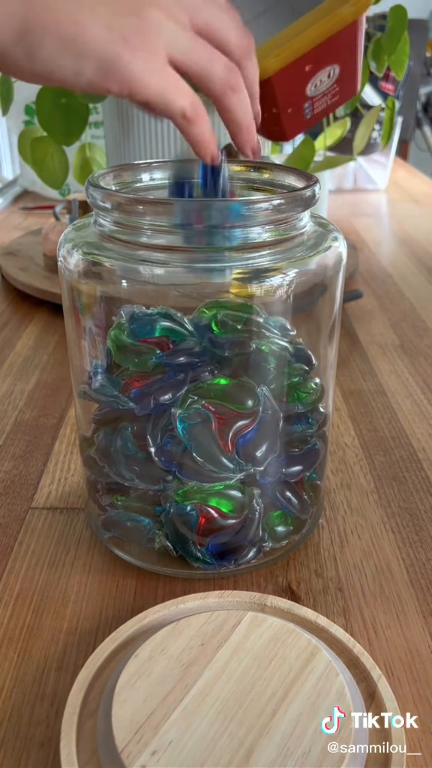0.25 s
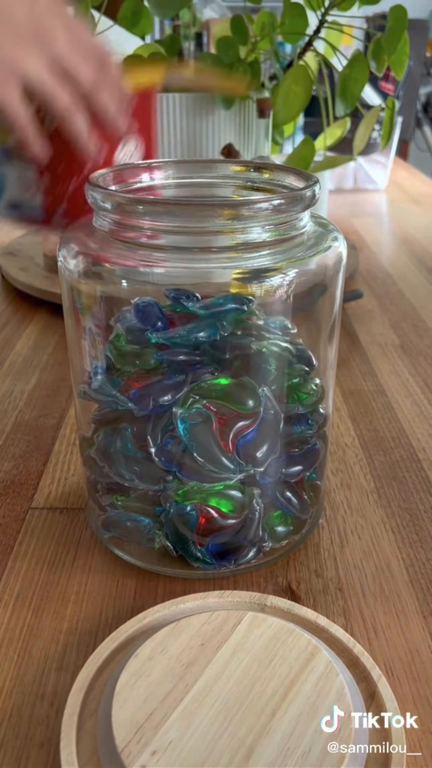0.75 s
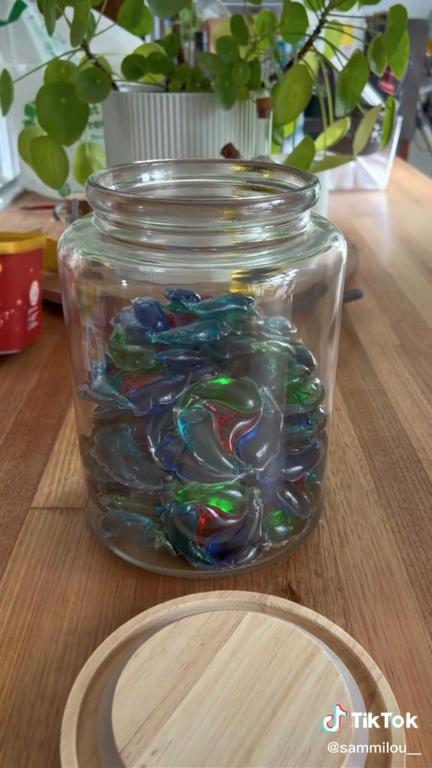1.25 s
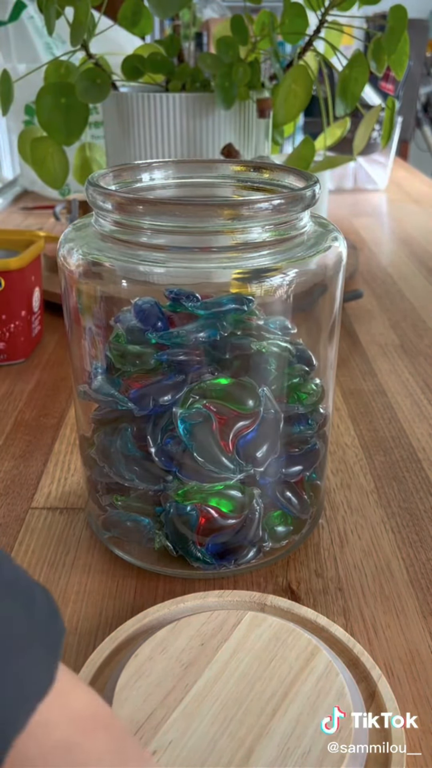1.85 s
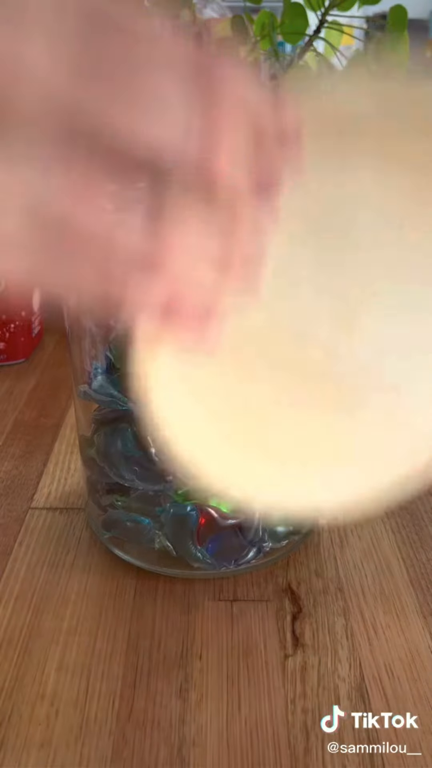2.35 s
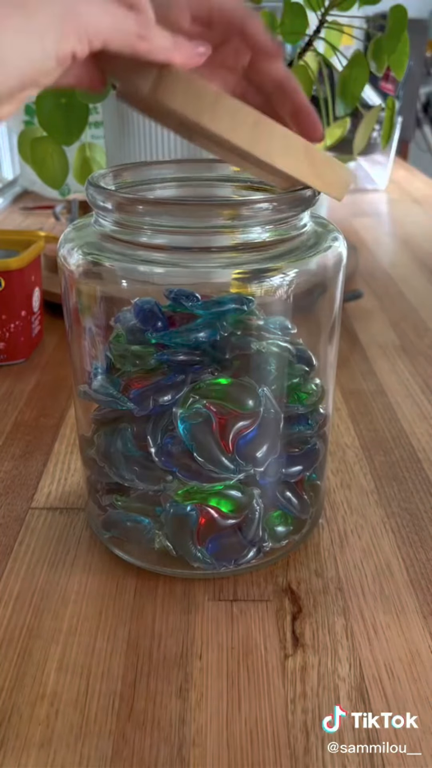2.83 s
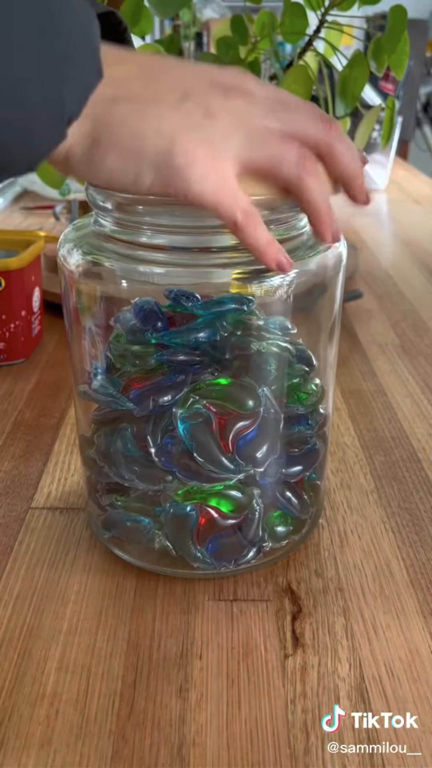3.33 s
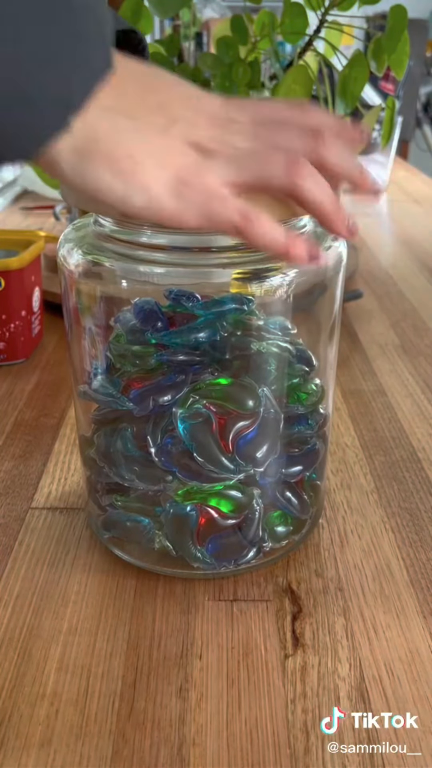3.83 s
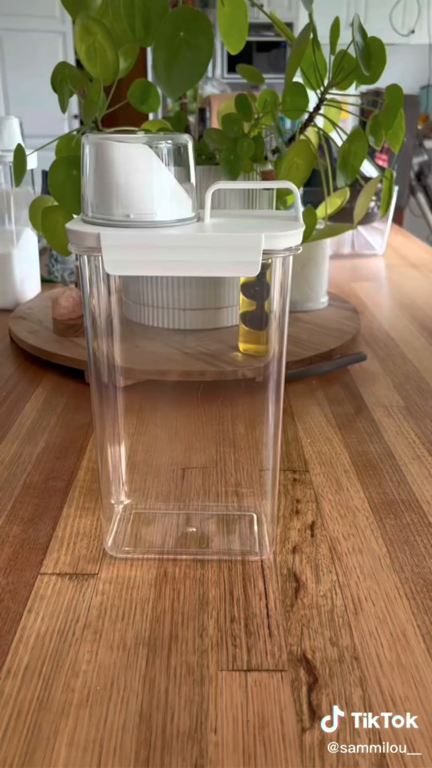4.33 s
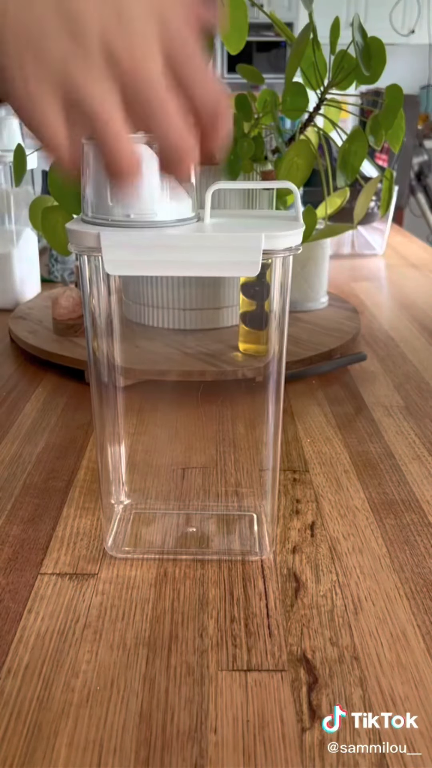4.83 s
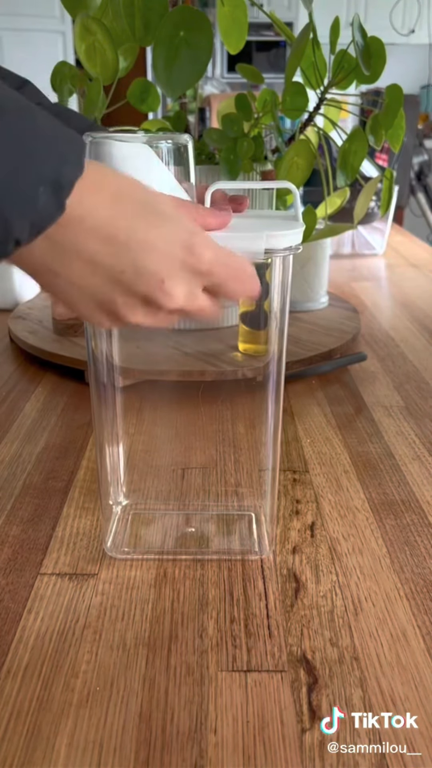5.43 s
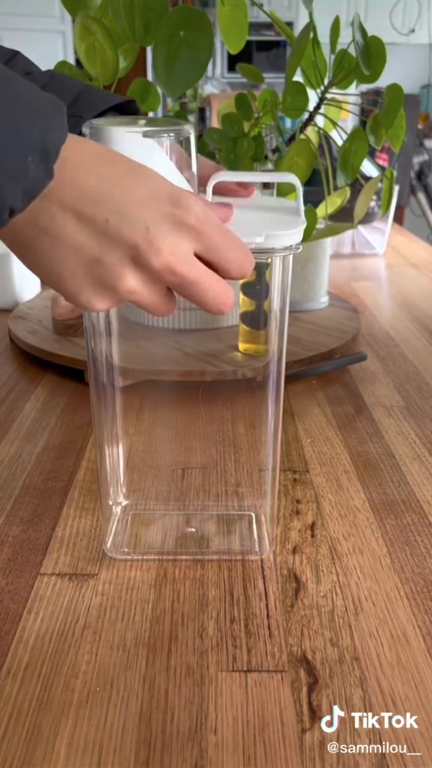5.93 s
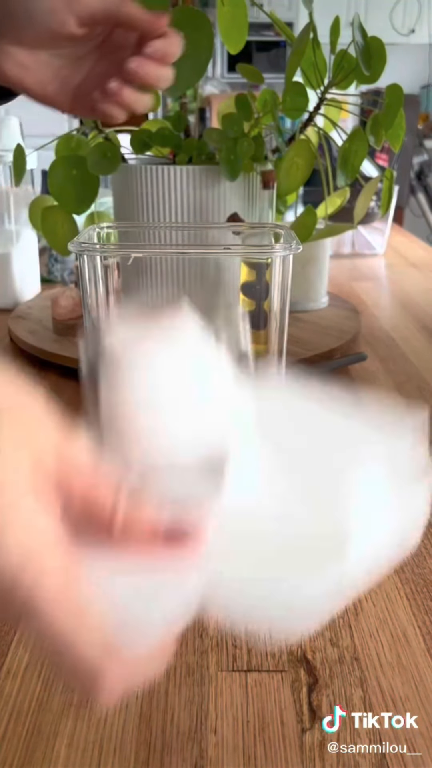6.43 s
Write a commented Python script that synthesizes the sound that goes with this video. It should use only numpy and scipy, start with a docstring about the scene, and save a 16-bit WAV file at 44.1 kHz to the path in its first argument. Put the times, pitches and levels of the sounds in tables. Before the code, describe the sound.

Close kitchen counter handling: faint pod taps, tub knock, wooden lid knocking onto glass, two sharp plastic latch snaps, and small creaks.

```python
"""Pods, a glass jar and a latched box

On a kitchen counter pods drop into a glass jar, an empty plastic tub is set down, a bamboo lid is slid off
the wood and pressed onto the jar; then two latches of a plastic box snap open and its lid is worked off.
Each blow rings modes of its object and of the wooden counter and adds a crack of noise; rubs are showers of
tiny blows, creaks are gliding sines, and a room of sparse echoes surrounds rumble, rustle, hush and faint hum.
"""
import sys
import numpy as np
from scipy import signal
from scipy.fft import rfft, irfft, next_fast_len
from scipy.io import wavfile
from scipy.ndimage import uniform_filter1d

SR = 44100
rng = np.random.default_rng(int(sys.argv[2]) if len(sys.argv) > 2 else 0)


def generate_wav(signal):
    """Clip the signal to [-1, 1] and save it as 16-bit WAV at the path in sys.argv[1]."""
    frames = np.transpose(np.atleast_2d(signal))
    scaled = np.clip(frames, -1, 1) * 32767
    pcm = np.round(scaled).astype(np.int16)
    wavfile.write(sys.argv[1], SR, pcm)


N = 294587

# In every table of blows, each row: start in seconds, object ring in dB, counter ring in dB,
# pitch that the counter favours there in Hz, crack in dB.
# In every table of modes, each row: frequency in Hz, relative level in dB, t60 in seconds before damping.
# In every table of colour, each row: frequency in Hz, spectral weight in dB per Hz.
# In every touch: contact in ms when ring and crack are equal in dB, dB of ring over crack that double it,
# crack t60 in ms, damping factor of the hand, tick against crack in dB.

# Pods landing in the jar, the modes of the glass, the colour of cracks on wood, and the touch.
PODS = [(0.303, -45, -38, 153, -69), (0.507, -58, -53, 218, -46.5), (0.594, -59, -60, 172, -51),
        (0.636, -50, -43, 202, -45.5), (0.67, -39, -49, 200, -46.5), (0.701, -33.5, -66, 121, -47),
        (0.835, -37, -55, 258, -40.5), (0.85, -41, -51, 237, -49), (0.985, -38, -47, 135, -65)]
JAR_MODES = [(270.6, -7, 0.09), (304.6, -5.5, 0.11), (398, -0.5, 0.042), (463, 1, 0.045), (533, 3.5, 0.025),
             (589, -6.5, 0.059), (644, -14.5, 0.096), (754, -25.5, 0.2), (915, -23, 0.012),
             (1070, -15, 0.064), (1395, -17, 0.08), (1520, -15.5, 0.011), (1770, -13.5, .026),
             (2060, 1, 0.025), (2964, -8, .08), (3548, -10, 0.063), (4540, -13.5, 0.076),
             (5700, -22.5, .06), (6080, -18.5, 0.11), (6290, -14.5, 0.05)]
WOOD_CRACK = [(350, -73), (600, 6), (916, -7), (1340, -0.5), (1580, -7.5), (2170, -7), (3500, -7.5),
              (4850, -14.5), (6210, -12.5), (15700, -26)]
PODS_TOUCH = (1.9, 113, 170, 1.1, 0)


def pods_into_jar():
    """Impact excitation: each soft pod rings the glass modes."""
    return blows(PODS, JAR_MODES, WOOD_CRACK, PODS_TOUCH)


# Blows of the tub on the counter, the modes of the tub, the colour of plastic cracks, and the touch.
TUB = [(1.066, -1.5, -25.5, 200, -7.5), (1.07, -16, -6.5, 137, -34.5), (1.097, -29, -46, 121, -36),
       (1.119, -40, -20, 118, -44), (1.168, -23, -39, 153, -27.5), (1.228, -26, -47, 200, -33.5),
       (1.24, -24, -50, 172, -27.5), (1.323, -28.5, -44, 151, -36), (1.412, -33, -34, 91, -70),
       (1.467, -52, -40, 115, -42.5)]
TUB_MODES = [(308, -2.5, 0.047), (430, 16.5, 0.012), (523, 3.5, 0.077), (570, -1, 0.053), (660, 0.5, 0.074),
             (827, 3, 0.023), (1148, 2, 0.068), (1750, 6.5, 0.0093), (2560, -10, 0.041)]
PLASTIC_CRACK = [(350, 9), (600, -7), (2000, -4), (2290, -6.5), (2930, -4), (3400, -3), (4060, -2.5),
                 (4850, -5), (6290, -3.5), (15700, -14.5)]
TUB_TOUCH = (0.63, 18, 30.5, 1.14, -0.5)


def tub_set_down():
    """Impact excitation: the plastic tub rings in heavily damped modes."""
    return blows(TUB, TUB_MODES, PLASTIC_CRACK, TUB_TOUCH)


# Blows of the bamboo lid on the wood, the modes of the lid, and the touch.
LID = [(1.538, -24.5, -29, 263, -29.5), (1.568, -19, -21, 194, -35), (1.597, -56, -23.5, 201, -48),
       (1.626, -48, -30, 202, -61), (1.736, -32.5, -47, 225, -43.5), (1.913, -29.5, -27, 227, -43),
       (1.938, -18.5, -25, 205, -42), (1.976, -28, -48, 258, -25), (1.987, -23, -48, 258, -34),
       (2.058, -35, -58, 164, -32), (2.784, -42, -40, 183, -47.5), (2.807, -35.5, -41, 62, -47)]
LID_MODES = [(302, 3.5, 0.15), (410, 15, 0.028), (574.5, -8, 0.48), (793, -2, 0.045), (1335, -5.5, 0.045),
             (1840, -9, 0.021), (2170, -1, 0.029), (2680, -6.5, .035), (2980, -4, 0.021),
             (3390, -16.5, 0.022), (3730, -9, 0.034), (4500, -18, .03), (6170, -13.5, 0.05)]
LID_TOUCH = (0.4, 50, 49, 1.6, 3)


def lid_off_the_wood():
    """Impact excitation: the bamboo lid rings as it knocks the counter."""
    return blows(LID, LID_MODES, WOOD_CRACK, LID_TOUCH)


# Blows of the lid on the jar, and the touch.
JAR = [(2.985, -41, -18.5, 211, -44.5), (3.026, -21, -40, 250, -29.5), (3.031, -43, -3, 256, -42),
       (3.0335, 5, -32, 252, -20), (3.04, -16, -20, 258, -50.5), (3.049, -19, -23.5, 236, -42),
       (3.257, -29.5, -28, 121, -47), (3.295, -20, -26, 135, -85), (3.351, -28, -23.5, 260, -59),
       (3.359, -9.5, -12.5, 203, -47), (3.473, -52, -60, 176, -22.5), (3.483, -26, -23, 124, -33),
       (3.502, -13.5, -32.5, 62.6, -31), (3.512, -16.5, -41, 258, -38), (3.527, -16, -45.5, 123, -44),
       (3.544, -52, -29, 121, -53), (3.61, -37, -35, 127, -60), (4.067, -66, -37, 183, -60)]
JAR_TOUCH = (0.55, 46, 18, 1.01, 1.4)


def lid_onto_jar():
    """Impact excitation: the lid strikes the jar and rings the glass modes."""
    return blows(JAR, JAR_MODES, WOOD_CRACK, JAR_TOUCH)


# Snaps of the latches and knocks of the box lid, the modes of the box, and the touch.
BOX = [(5.016, -10.5, -50, 217, -14.5), (5.023, -5.5, -0.5, 227, -12.5), (5.04, -7, -9, 231, -11.5),
       (5.05, -15.5, -11.5, 227, -25), (5.072, -24, -37, 223, -36), (5.092, -27, -32, 223, -49),
       (5.179, -38.5, -18, 219, -52), (5.246, -41, -20.5, 216, -56), (5.303, -28.5, -27.5, 217, -45.5),
       (5.435, -38, -52, 244, -29), (5.4445, -1, -27, 250, -4), (5.448, -1.5, -43, 250, -14.5),
       (5.452, -2.5, -6, 250, -19), (5.469, -1.5, -1, 240, -16.5), (5.475, -11.5, -28, 135, -19),
       (5.519, -44, -11.5, 123, -31), (5.649, -19, -31, 204, -41.5), (5.711, -31, -30.5, 218, -34.5),
       (5.791, -33.5, -27.5, 200, -35), (5.871, -49, -33, 209, -54), (5.899, -44, -33, 242, -45),
       (5.912, -28.5, -28.5, 150, -33), (5.997, -30.5, -22.5, 150, -33.5), (6.014, -30, -58, 250, -35),
       (6.141, -50, -43, 204, -41.5), (6.2, -65, -53, 255, -27.5), (6.256, -65, -29, 142, -27.5),
       (6.268, -59, -48, 199, -47)]
BOX_MODES = [(219.5, -3, 0.075), (293, -12, 0.13), (372, -16, 0.096), (442, -5, 0.08), (531, -1.5, 0.029),
             (603, 4.5, 0.1), (677, -6.5, 0.17), (804, 0, 0.074), (997, 0, 0.032), (1118, 0.5, 0.019),
             (1403, 2, 0.018), (1590, -1.5, 0.036), (1864, 2, 0.019), (2120, 0.5, 0.024), (2920, 5, 0.024),
             (3560, -6.5, 0.027), (4020, 14.5, 0.0071), (5450, -0.5, 0.03), (6160, -4.5, 0.023)]
BOX_TOUCH = (0.15, 5.28, 43.4, 0.77, 2.3)


def box_opened():
    """Impact excitation: hard snaps have a short contact and so a bright spectrum."""
    return blows(BOX, BOX_MODES, PLASTIC_CRACK, BOX_TOUCH)


# The modes of the wooden counter.
COUNTER_MODES = [(49.6, -8, 0.23), (85, -34, .2), (121, 2, 0.18), (139, 7.5, 0.051), (172, -5, 0.079),
                 (217, 16, 0.044), (242, -6, 0.11)]
TICK_FROM_HZ = 1250  # the hard edge of a blow rings the modes above this
BLOW_DETUNE = 0.012  # each blow randomly detunes each mode by up to this share


def blows(rows, modes, crack_colour, touch):
    """Modal superposition: a blow rings object and counter, ticks upper modes and cracks; returns rings, cracks."""
    rings, cracks = np.zeros((2, N))
    equal_ms, doubling_db, crack_t60_ms, damping, tick_db = touch
    upper_db = np.where(np.transpose(modes)[0] > TICK_FROM_HZ, 0, -99)
    counter_hz = np.transpose(COUNTER_MODES)[0]
    for start, object_db, counter_db, favoured_hz, crack_db in rows:
        chance_db = 2 * np.clip(rng.standard_normal(32), -1.5, 1.5)
        tuning = 1 + BLOW_DETUNE * rng.uniform(-1, 1, 32)
        thing = decays(modes, damping, tuning[:len(modes)])
        counter = decays(COUNTER_MODES, 0.86, tuning[-len(COUNTER_MODES):])
        thing_db = chance_db[:len(thing)]
        place_db = -9.0 * np.log2(counter_hz / favoured_hz) ** 2
        counter_weight_db = chance_db[-len(counter):] + place_db
        # dull blows touch longer
        contact_ms = np.clip(equal_ms * 2 ** ((object_db - crack_db) / doubling_db), 0.1, 2.2)
        counter_ms = 3.97 * max(contact_ms, 0.5)
        add(rings, start, gain_of(object_db) * ring(thing, thing_db, contact_ms))
        add(rings, start, gain_of(counter_db) * ring(counter, counter_weight_db, counter_ms))
        add(rings, start, gain_of(crack_db + tick_db) * ring(thing, thing_db + upper_db, 0))
        add(cracks, start, burst(crack_colour, crack_db, crack_t60_ms))
    return np.array([rings, cracks])


def decays(modes, damping=1, tuning=1):
    """Free vibration: one exponentially dying sine a mode, neighbours swinging in opposite senses."""
    t = np.arange(SR // 4) / SR
    hz, db, t60 = np.transpose(modes)[:, :, None]
    sense = (-1.0) ** np.arange(len(modes))[:, None]
    turns = hz * np.reshape(tuning, (-1, 1)) * t
    fade_out = np.cos(2 * np.pi * t) ** 2  # silent by the end of the quarter second
    return sense * gain_of(db - 60 * damping * t / t60) * np.sin(2 * np.pi * turns) * fade_out


def ring(rings, weight_db, contact_ms):
    """Contact-time filtering: convolution with a long force pulse leaves high modes quiet."""
    force = signal.windows.hann(3 + int(contact_ms * SR / 1000))
    return peaked(np.convolve(gain_of(weight_db) @ rings, force))


def burst(colour, db, t60_ms):
    """Decaying noise transient: long cracks swell more slowly; a filter lowers the top of quiet ones."""
    noise = evened(coloured(rng.standard_normal(8000), colour))
    noise = coloured(noise, [(12600, 0.081), (13300, 0.82 * min(db + 8.5, 0))])
    spent = 1000 * np.arange(8000) / SR / t60_ms  # time as a share of t60
    swell = np.minimum(spent / 0.054, 1)
    return gain_of(db - 60 * spent) * noise * swell


# Loose plastic, then the lid on the rim, rattling on after hard blows.
# Each row: start in seconds, level in dB, t60 in ms (the burst stops after 0.18 s).
RATTLES = [(1.07, -34, 930), (5.051, -21.5, 145), (5.473, -22, 69)]
LID_RATTLES = [(3.037, -32.5, 61), (3.502, -29.5, 110)]


def rattles():
    """Chatter of loose contacts as decaying noise, coloured by plastic or by wood."""
    out = np.zeros(N)
    for rows, colour in (RATTLES, PLASTIC_CRACK), (LID_RATTLES, WOOD_CRACK):
        for start, db, t60_ms in rows:
            add(out, start, burst(colour, db, t60_ms))
    return out


# Slips of the box lid in its seat.
# Each row: start in seconds, peak level in dB, starting pitch in Hz, t60 in ms.
CREAKS = [(5.914, -20, 253, 63), (5.944, -22.5, 284.7, 340), (5.966, -24, 257, 38),
          (5.995, -24.5, 287.3, 180), (6.07, -38, 283, 130), (6.123, -20, 292.3, 48), (6.143, -21, 304, 50),
          (6.161, -26, 300, 87), (6.185, -40, 277, 57), (6.232, -24.5, 217, 75), (6.254, -23, 286, 51),
          (6.271, -30, 278, 53)]
CREAK_RISE_MS, CREAK_GLIDE = 3.2, 1.1  # glide in octaves a second


def creaks():
    """Stick-slip: each slip swings the box wall at a pitch that slides up as the grip changes."""
    out, t = np.zeros(N), np.arange(5000) / SR
    for start, db, hz, t60_ms in CREAKS:
        swing = np.minimum(1000 * t / CREAK_RISE_MS, 1) * gain_of(-60000 * t / t60_ms)
        turns = np.cumsum(hz * 2 ** (CREAK_GLIDE * t)) / SR
        add(out, start, gain_of(db) * peaked(swing * np.sin(2 * np.pi * turns)))
    return out


# The lid sliding on the wood. Each row: time in seconds, level in dB.
LID_SCRAPE = [(1.92, -51), (1.94, -42), (1.985, -33.5), (2.03, -54), (2.05, -61), (2.06, -53), (2.083, -48),
              (2.1, -72)]


def lid_scrape():
    """Friction excitation of the bamboo lid."""
    return scrape(LID_SCRAPE, LID_MODES, WOOD_CRACK, damping=1.0, rasp_share=0.67)


# Fingers on the box lid. Each row: time in seconds, level in dB.
BOX_RUB = [(5.85, -70), (5.875, -50), (5.91, -47), (5.95, -63), (6.0, -47), (6.06, -52), (6.11, -73),
           (6.145, -53), (6.19, -47.5), (6.27, -58), (6.31, -70)]


def box_rub():
    """Friction excitation of the plastic box."""
    return scrape(BOX_RUB, BOX_MODES, PLASTIC_CRACK, damping=0.7, rasp_share=1.0)


# Fingers in the tub. Each row: time in seconds, level in dB.
TUB_RUB = [(0.58, -76), (0.63, -56), (0.7, -47.5), (0.76, -72)]


def tub_rub():
    """Friction excitation of the tub, strongly damped by the hand."""
    return scrape(TUB_RUB, TUB_MODES, WOOD_CRACK, damping=1.9, rasp_share=0.5)


RUB_DETUNE = 0.077  # each mode copy is randomly detuned by up to this share


def scrape(stroke, modes, colour, damping, rasp_share):
    """Friction as random impulses: uneven catches ring one or another upper mode over a rasp of noise."""
    out, size = np.zeros(N), SR // 2
    strength = gain_of(4.0 * np.minimum(rng.exponential(1, size), 2.5))
    caught = rng.random(size) < 1800 / SR  # about 1800 catches a second
    catches = rng.standard_normal(size) * strength * caught
    upper = 2 * [mode for mode in modes if mode[0] > 1100]  # two copies of each mode
    tuning = 1 + RUB_DETUNE * rng.uniform(-1, 1, len(upper))
    rings = decays(upper, damping, tuning)[:, :2000]
    which = rng.integers(0, len(rings), size)
    rung = np.zeros(size)
    for k, mode_ring in enumerate(rings):
        rung += signal.oaconvolve(catches * (which == k), mode_ring)[:size]
    rasp = coloured(rng.standard_normal(size), colour)
    add(out, stroke[0][0], evened(evened(rung) + rasp_share * evened(rasp)))
    return gain_of(*curve(stroke)) * out


# The seal in the rim of the jar. Each row: time in seconds, hiss in dB, squeak in dB.
SEAL_RUB = [(3.355, -99, -80), (3.365, -50, -64), (3.39, -41, -59), (3.46, -43, -53), (3.52, -59, -50),
            (3.62, -75, -48), (3.75, -58, -51), (3.9, -69, -58)]
# Colours of the hiss and of the squeak.
SEAL = [(400, -21), (1200, -9), (2500, 0.5), (6000, -5.5), (9500, -2), (12600, -3), (13300, -15),
        (15500, -12)]
SQUEAK = [(1900, -42), (2300, -1), (2440, 1.5), (2600, -11), (2900, -3), (3200, -20), (3500, -5),
          (3800, -12), (6100, -21), (6380, -3), (6700, -47)]


def seal_rub():
    """Friction noise: a broad hiss and a squeak gathered in narrow bands."""
    hiss_db, squeak_db = curve(SEAL_RUB)
    hiss = stirring(SEAL, hiss_db, patchy_db=1.7, flicker_db=1.9)
    return hiss + stirring(SQUEAK, squeak_db, patchy_db=0.64, flicker_db=0.69)


# Arms leaning on the counter. Each row: middle in seconds, level in dB, half length in seconds.
LEANS = [(0.124, -55, 0.061), (1.304, -28.5, 0.081), (1.922, -46, 0.11), (2.812, -53, 0.033),
         (3.133, -38, 0.035), (3.406, -27, 0.12), (3.57, -43, 0.054), (5.56, -38, 0.081),
         (6.117, -28, 0.06), (6.352, -39.5, 0.3)]
# The floor under them. Each row: time in seconds, level in dB.
LEAN_FLOOR = [(0, -69), (3.6, -46.5), (4.2, -52), (4.32, -65), (5.9, -57), (6.68, -48)]
# Colour of the thuds.
THUD = [(12, -41), (20, -17), (31, -15.5), (48, -21), (97, -31), (110, 2), (140, -42), (240, -120)]


def leaning_thuds():
    """Low-frequency noise under Gaussian envelopes: each lean swells and fades like a bell curve."""
    t = np.arange(N) / SR
    level = gain_of(*curve(LEAN_FLOOR))
    for middle, db, half in LEANS:
        level += gain_of(db) * np.exp(-((t - middle) / half) ** 2)
    return stirring(THUD, 20 * np.log10(level), patchy_db=4.0, flicker_db=3)


# Movement close by. Each row: time in seconds, rumble in dB before the blows add to it,
# rustle of sleeves and hands in dB.
STIR = [(0.0, -47.5, -67.5), (0.29, -49.5, -85), (0.3, -46, -55), (0.42, -49, -60), (0.66, -46.5, -54.5),
        (1.2, -45.5, -50.5), (1.36, -34, -49), (1.46, -44.5, -51), (1.95, -45.5, -56.5),
        (2.15, -45.5, -49.5), (2.61, -48, -52), (2.82, -49.5, -65), (3.0, -45.5, -55.5), (3.4, -39, -61),
        (3.5, -57, -46.5), (3.79, -48.5, -51.5), (4.3, -47, -49.5), (4.32, -52, -59), (4.81, -55, -47.5),
        (4.98, -48, -53), (5.36, -39, -54.5), (5.77, -44.5, -54), (5.98, -39, -59), (6.27, -51.5, -51),
        (6.68, -45.5, -51)]
# Colours of the rumble and of the rustle.
RUMBLE = [(41, -37), (70, -9.5), (184, 5), (314, -3.5), (519, -8), (606, -9), (741, -26), (875, -26.5),
          (1000, -15.5), (1300, -20.5), (2200, -120)]
RUSTLE = [(290, -58), (500, 5), (606, -3), (746, -6), (917, -6), (1570, -5), (2480, -4.5), (5210, -8.5),
          (7670, -9), (9700, -16), (11600, -12), (12800, -20.5), (13500, -37.5)]


def movement(dry):
    """Amplitude-modulated noise: rumble, stirred up for a while by each blow, and rustle."""
    rumble_db, rustle_db = curve(STIR)
    rumble_db = stirred(rumble_db, dry, db=-14.5, t60=0.14)
    rumble = stirring(RUMBLE, rumble_db, patchy_db=1.0, flicker_db=2.25)
    return rumble + stirring(RUSTLE, rustle_db, patchy_db=1.4, flicker_db=0.6)


def stirred(level_db, dry, db, t60):
    """Energy storage: a leaky integrator adds the fading power of the blows to a level."""
    keep = gain_of(-120 / (t60 * SR))  # power kept from one sample to the next
    power = signal.lfilter([1 - keep], [1, -keep], dry ** 2)
    return 10 * np.log10(gain_of(2 * level_db) + gain_of(2 * db) * power)


# Faint tones. Each row: start in seconds, end in seconds, frequency in Hz, level in dB around which it wavers.
HUM = [(3.7, 4.64, 930, -62), (0, 6.68, 1865, -76), (0, 6.68, 2790, -76)]


def hum():
    """Slow random modulation: thin tones whose level and pitch waver."""
    out = np.zeros(N)
    for start, end, hz, db in HUM:
        t = np.arange(0, end - start, 1 / SR)
        waver = np.interp(t, np.arange(100) / 12, rng.standard_normal(100))
        tone = np.sin(2 * np.pi * hz * t + 2 * waver)
        add(out, start, gain_of(db + 2 * waver) * tone * signal.windows.tukey(len(t), 0.1))
    return out


# Colour of the steady hush of the room.
AIR = [(290, -46), (500, -58), (796, -3.5), (947, -22), (1770, -13), (1920, -17), (2820, -15.5),
       (3580, -26.5), (12000, -43), (15600, -69), (22000, -120)]


def hush():
    """Stationary coloured noise: the steady hush of the room."""
    return stirring(AIR, level_db=-63, patchy_db=1.06, flicker_db=0.71)


def background(dry):
    """Superposition of thuds, movement, seal, hush and hum."""
    return leaning_thuds() + movement(dry) + seal_rub() + hush() + hum()


def stirring(colour, level_db, patchy_db, flicker_db):
    """Short-time spectral synthesis: random spectra with drifting patches and a flicker shared by all pitches."""
    frames, hz = N // 256 + 5, np.fft.rfftfreq(1024, 1 / SR)
    real, imaginary, patches = rng.standard_normal((frames, 513, 3)).T
    patches = uniform_filter1d(patches, size=14, axis=0)  # over frequency
    patches = evened(uniform_filter1d(patches, size=12, axis=1))  # over time
    flicker = evened(uniform_filter1d(rng.standard_normal(frames), size=4))
    weight_db = read(colour, hz)[:, None] + patchy_db * patches + flicker_db * flicker
    spectra = (real + 1j * imaginary) * gain_of(weight_db)
    noise = signal.istft(spectra, nperseg=1024, noverlap=768)[1][:N]
    return gain_of(level_db) * evened(noise)


# Decay of the room. Each row: frequency in Hz, t60 in seconds before shortening.
ROOM = [(100, 0.48), (260, 0.41), (700, 0.55), (1840, 0.33), (4850, 0.42)]


def echoes(x, start_ms, shorten):
    """Sparse-tap reverberation: taps of random sign, one in every 20 samples, each band dying at its own speed."""
    taps = np.zeros(SR)
    slots = np.arange(int(start_ms * SR / 1000), SR - 20, 20)
    at = slots + rng.integers(0, 20, len(slots))
    taps[at] = rng.choice([-1.0, 1.0], len(slots))
    hz, t, spectra = signal.stft(taps, SR, nperseg=256)
    t60 = shorten * read(ROOM, hz)[:, None]
    tail = signal.istft(spectra * gain_of(-60 * t / t60), SR, nperseg=256)[1]
    return signal.fftconvolve(x, tail / np.linalg.norm(tail))[:N]


# Less of the upper rings reaches the room. Each row: frequency in Hz, gain in dB.
RINGS_TO_ROOM = [(400, 0.5), (900, -3.5), (4000, -12.5)]
# Colour of the room against the direct sound. Each row: frequency in Hz, gain in dB.
ROOM_COLOUR = [(60, -5), (250, -4.5), (450, -6), (700, -4.5), (1200, -2.5), (2000, -1), (6000, -8.5),
               (12000, -19), (13200, -41)]


def room(rings, noises):
    """Reverberant field: rings with less treble and full noises return as coloured echoes."""
    spread = coloured(rings, RINGS_TO_ROOM) + noises
    return coloured(echoes(spread, start_ms=6.0, shorten=0.96), ROOM_COLOUR)


# Width of the stereo image. Each row: frequency in Hz, side gain in dB.
WIDTH = [(60, -69), (200, -43), (400, -13.5), (640, 0.5), (1400, -1), (3000, -4.5), (5000, -2.5),
         (8000, -11), (13000, -5.5)]


def side_paths(dry, around):
    """Decorrelation: the two ports differ by what reaches them over other paths."""
    late = gain_of(-9.5) * echoes(dry, start_ms=1.5, shorten=1.0)
    return coloured(late + echoes(around, start_ms=1.583, shorten=0.011), WIDTH)


# Bass reduction of the later part. Each row: frequency in Hz, gain in dB.
THIN = [(50, -16.5), (110, -7.5), (180, -1)]
THIN_S = 4.31


def thinned(mid):
    """Spectral weighting: from THIN_S on the whole mid signal has less bass."""
    return np.where(np.arange(N) < THIN_S * SR, mid, coloured(mid, THIN))


def gain_of(db):
    """Decibel law: level to amplitude factor."""
    return 10 ** (np.asarray(db) / 20)


def evened(x):
    """Normalisation to unit effective value."""
    return x / np.sqrt(np.mean(x ** 2) + 1e-20)


def peaked(x):
    """Normalisation to unit peak."""
    return x / (abs(x).max() + 1e-20)


def read(points, hz):
    """Interpolation of a table on a logarithmic frequency axis."""
    f, value = np.transpose(points)
    return np.interp(np.log(hz + 1), np.log(f + 1), value)


def coloured(x, points):
    """Linear filtering: weights the spectrum of x by a table of dB."""
    size = next_fast_len(len(x))
    weight = gain_of(read(points, np.fft.rfftfreq(size, 1 / SR)))
    return irfft(rfft(x, size) * weight, size)[:len(x)]


def curve(rows):
    """Linear interpolation of the columns at every sample, 40 dB under the first column's least outside them."""
    s, *columns = np.transpose(rows)
    outside = columns[0].min() - 40
    return [np.interp(np.arange(N) / SR, s, c, outside, outside) for c in columns]


def add(mix, start, sound):
    """Superposition: adds a sound in place from its start in seconds."""
    part = mix[round(start * SR):][:len(sound)]
    part += sound[:len(part)]


def scene():
    """Superposition of direct sound, room and background, spread from mid and side to left and right."""
    rings, cracks = pods_into_jar() + tub_set_down() + lid_off_the_wood() + lid_onto_jar() + box_opened()
    noises = cracks + rattles() + creaks() + lid_scrape() + box_rub() + tub_rub()
    dry = rings + noises
    around = background(dry)
    mid = thinned(dry + room(rings, noises) + around)
    side = side_paths(dry, around)
    return np.array([mid + side, mid - side])


MIC_HZ, EDGE_HZ = 48.3, 15900  # bass limit of the microphone, upper band limit


def record(dry):
    """Filtering and clipping: bass loss in the microphone, overload of the input and a band limit at EDGE_HZ."""
    high_pass = signal.butter(3, MIC_HZ, "high", fs=SR, output="sos")
    clipped = np.clip(signal.sosfilt(high_pass, dry), -1, 1)
    low_pass = signal.firwin(1023, EDGE_HZ, window=("kaiser", 11), fs=SR)
    return signal.oaconvolve(clipped, low_pass[None], "same")


dry = scene()
out = record(dry)
generate_wav(out)
```